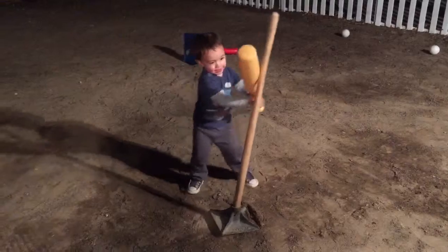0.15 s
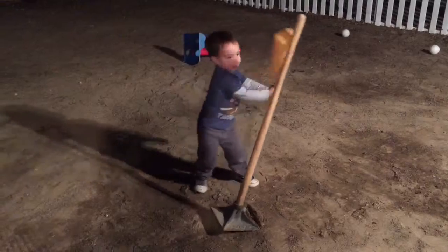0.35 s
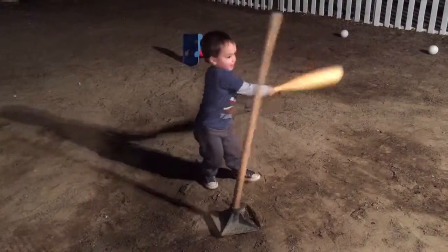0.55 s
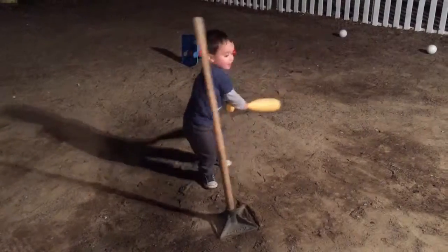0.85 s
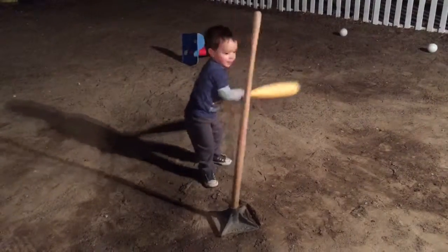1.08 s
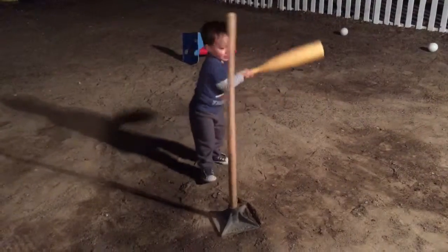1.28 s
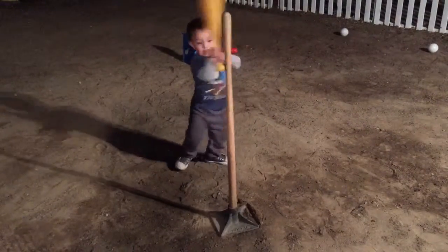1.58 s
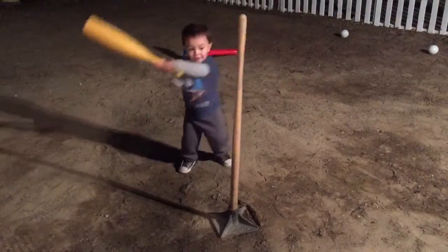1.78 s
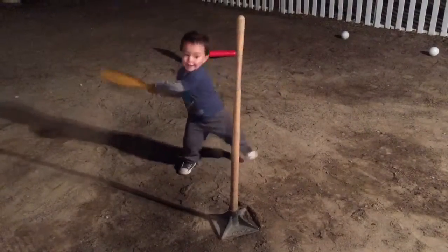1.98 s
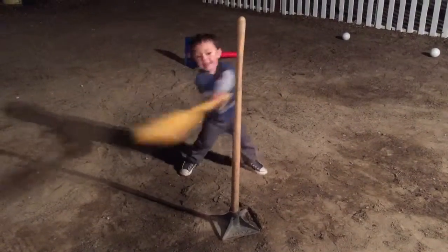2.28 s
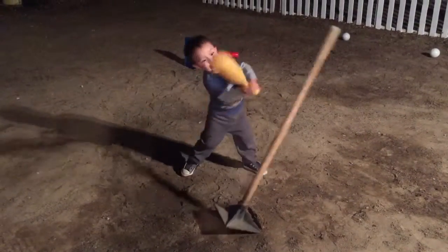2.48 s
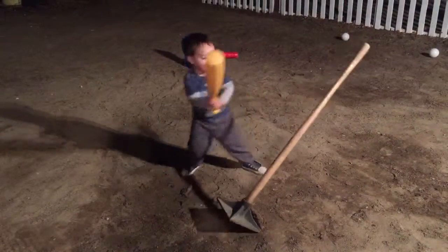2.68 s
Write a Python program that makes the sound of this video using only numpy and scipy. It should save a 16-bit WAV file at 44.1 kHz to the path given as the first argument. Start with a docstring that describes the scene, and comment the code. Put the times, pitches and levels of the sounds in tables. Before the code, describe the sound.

A hollow plastic bat lightly bumps a wooden pole, then gives it one loud whack.

```python
"""Plastic bat on a wooden pole

A quiet yard at night, one microphone close to an upright pole on a loose base. A hollow plastic bat
scrapes along the wood in thousands of tiny slips and slides off, then bumps it lightly while the
base clinks. A hard whack rings the bat's shell and the air inside it; nearby walls throw the sound
back to the microphone and the yard rings briefly."""
import sys
import numpy as np
from scipy import signal
from scipy.fft import rfft, irfft, next_fast_len
from scipy.io import wavfile

SR = 44100
rng = np.random.default_rng(int(sys.argv[2]) if len(sys.argv) > 2 else 0)


def to_wav(sig):
    """Store sig (one row per channel, or 1-D mono) as 16-bit WAV at the path in sys.argv[1].

    Samples outside -1..1 are clipped; the rate is SR.
    """
    pcm = np.clip(np.atleast_2d(sig), -1, 1) * 32767
    pcm = np.round(pcm).astype(np.int16)
    wavfile.write(sys.argv[1], SR, pcm.T)  # frames by channels


N = 125685
RING_SIZE = 8192  # samples


# the hard swing, close to the microphone: t/s, level/dB
WHACKS = [(2.475, -2.5)]
def whacks(mix):
    """A hard blow rings the bat and sets the yard sounding."""
    for start, db in WHACKS:
        add(mix, start, amp(db) * (blow_with_echoes() + yard_wash()))


# modes of the air inside the bat: f/Hz, level in a whack/dB, level in a bump/dB, t60/s
BAT_AIR_MODES = [(311.7, -30.5, -6, 0.26), (596, -34, 4.5, 0.033), (1140, -13, 4.5, 0.055),
                 (1664, -17, -1, .11), (2196, -16.5, 5.5, 0.074), (2937, -23.5, -11, 0.15),
                 (3590, -19.5, -11, 0.076), (6480, -33, -8.5, 0.055)]
# modes of its plastic wall, stirred only by a hard blow: f/Hz, level/dB, t60/s
BAT_WALL_MODES = [(141, -30, 0.066), (396.3, -15, 0.042), (630.3, -29, .15), (783, -23, 0.085),
                  (879, -21.5, .075), (1063, -34.5, 0.22), (1169, -23, 0.077), (1282, -22.5, 0.09),
                  (1589, -14.5, 0.15), (1617, -23.5, .15), (1787, -23, 0.078), (2005, -19.5, 0.21),
                  (2100, -11, 0.054), (2397, -14, 0.085), (2423, -25, .08), (2740, -28, 0.14),
                  (2812, -18, .04), (2976, -28.5, .09), (3270, -20, 0.046), (3450, -27.5, .12),
                  (3640, -18, 0.056), (4110, -36, 0.11), (4170, -27.5, 0.074)]
SHELL_RISE_S = 0.0011
def bat_ring():
    """The hollow note: air column and plastic wall ring together."""
    onset = 1 - np.exp(-times(RING_SIZE) / SHELL_RISE_S)
    return partials(BAT_AIR_MODES + BAT_WALL_MODES) * onset


# dense, short-lived ringing of the shell: f/Hz, spectral level/dB, t60/s
SHELL_BANDS = [(30, -44.5, .1), (150, -2.5, 0.076), (413, -1.5, 0.055), (830, 1, .054), (2260, 5.5, 0.077),
               (4450, -6, .07), (6320, -12, 0.035), (7500, -19.5, 0.017), (15880, -27.5, .025)]
# the crack of contact: f/Hz, spectral level/dB
CRACK_SPECTRUM = [(300, -22), (3000, -23.5), (4500, -2), (5700, 0.5), (6600, -8), (8000, -5),
                  (11000, -15.5), (13700, -12.5), (16500, -19)]
# the bat's wall snapping at the point of contact: f/Hz, level/dB, t60/s
SNAP_MODES = [(5360, -7.5, 0.012), (5745, -2.5, 0.007), (6310, -9, 0.014), (13130, -8.5, .003)]
def strike(crack_decay_s=0.00084):
    """A snap and crack at contact, then the shell's buzz; the fine grain differs with direction."""
    t = times(RING_SIZE // 2)
    shell = amp(-11) * dense_ring(SHELL_BANDS, len(t)) * (1 - np.exp(-t / SHELL_RISE_S))
    crack = amp(-4.5) * noise(CRACK_SPECTRUM, len(t)) * np.exp(-t / crack_decay_s)
    return shell + crack + partials(SNAP_MODES)[:len(t)]


# walls and fence, 7 to 36 m of extra path: delay/s, ring level/dB, strike level/dB, treble limit/Hz
WALL_ECHOES = [(0.0199, -1, -3.5, 2700), (0.0217, -11, -10, 4800), (0.0389, -12.5, -15.5, 4000),
               (.04406, -11, -10.5, 4200), (.04762, -10.5, -16, 2600), (.05425, -22.5, -24.5, 12000),
               (0.105, -32, -31.5, 9050)]
def blow_with_echoes(bass_limit_hz=114):
    """Ring and strike reach the microphone directly, then off the walls with the strike dulled."""
    sound = np.zeros(SR // 2)
    ring = bat_ring()
    add(sound, 0, ring)
    add(sound, 0, strike())
    for delay, ring_db, strike_db, limit_hz in WALL_ECHOES:
        add(sound, delay, amp(ring_db) * ring)
        add(sound, delay, amp(strike_db) * lowpass(strike(), limit_hz))
    # the blow carries little deep bass
    return signal.lfilter(*signal.butter(2, bass_limit_hz, "high", fs=SR), sound)


# the bat rubbing along the pole, close by: t/s, body level/dB, hiss level/dB
RUB_LEVELS = [(0, -64.5, -69.5), (.065, -74, -62.5), (.118, -60, -66.5), (.15, -55, -63),
              (.205, -64.5, -67.5), (.24, -72, -77), (.285, -64, -79), (.32, -63.5, -72.5),
              (0.401, -59.5, -53.5), (0.418, -51.5, -55.5), (.448, -56, -54), (0.472, -53, -57),
              (0.49, -47.5, -53.5), (0.501, -80, -72), (.56, -91, -86)]
# the rub's body and its hiss: f/Hz, spectral level/dB
RUB_BODY_SPECTRUM = [(80, -21), (170, 3), (540, -12.5), (2300, 0.5), (4600, -18)]
RUB_HISS_SPECTRUM = [(1500, -17), (4000, -3), (5000, -3), (5700, 1), (6400, 3), (7100, -9.5), (9500, -11),
                     (11000, -25), (14000, -20), (16000, -33)]
def scrape(slips_per_s=3000, spread_db=2, pole_db=2.5, yard_db=-16):
    """Tiny slips hiss at the contact and stir bat and pole; the yard adds a short tail."""
    t = times(4 * RING_SIZE)
    sizes = amp(spread_db * np.minimum(rng.exponential(1, len(t)), 4))
    pressure = waver(len(t), depth_db=0.6, rate_hz=117)
    slips = rng.standard_normal(len(t)) * sizes * pressure
    slips *= rng.random(len(t)) < slips_per_s / SR
    wood = unit_rms(signal.fftconvolve(slips, pole_ring())[:len(t)])
    knots, body_db, hiss_db = np.transpose(RUB_LEVELS)
    body = unit_rms(colour(slips, RUB_BODY_SPECTRUM) + amp(pole_db) * wood)
    body *= amp(np.interp(t, knots, body_db))
    hiss = colour(slips, RUB_HISS_SPECTRUM) * amp(np.interp(t, knots, hiss_db))
    direct = (body + hiss) * (t < knots[-1])
    tail = unit_rms(dense_ring(NEAR_SCATTER, RING_SIZE)) / np.sqrt(RING_SIZE)
    return direct + amp(yard_db) * signal.fftconvolve(direct, tail)[:len(t)]


# the sliding bat catches on the wood: t/s, level/dB
BAT_CATCHES = [(.411, -50), (.4665, -50.5), (.488, -53.5)]
def catches(mix, decay_s=0.0018):
    """Each catch is a quick cluster of slips that rings the pole."""
    t = times(SR // 50)
    for start, db in BAT_CATCHES:
        slips = rng.standard_normal(len(t)) * np.exp(-t / decay_s)
        ring = signal.fftconvolve(slips, pole_ring())
        add(mix, start, amp(db) * ring / np.std(ring[:len(t) // 2]))


# modes of the wooden pole: f/Hz, level/dB
POLE_MODES = [(420, -5.5), (715, -11), (795, -4.5), (1060, -1.5), (1770, 1.5), (2290, 1.5), (2760, -0.5),
              (3660, -0.5), (4400, -5), (5880, -0.5), (6300, -5)]
def pole_ring(t60_cycles=76):
    """The wood's ring; higher modes die sooner."""
    return partials([(hz, db, t60_cycles / hz) for hz, db in POLE_MODES])


# light contacts of bat and pole: t/s, level/dB, treble limit/Hz, rise/s, factor on the free ring time
LIGHT_BUMPS = [(.7715, -49, 4500, 0.0085, 0.63), (.7848, -45, 3120, 0.00092, 1.09),
               (.7955, -40, 6100, 0.0066, 0.24), (1.388, -56.5, 1870, 0.018, 1.28)]
def bumps(mix, buzz_db=-7.5):
    """Soft contacts sound the air in the bat and its shell; the pole's damping varies with each."""
    for start, db, limit_hz, rise_s, ring_factor in LIGHT_BUMPS:
        ring = partials([(hz, level, t60 * ring_factor) for hz, _, level, t60 in BAT_AIR_MODES])
        add(ring, 0, amp(buzz_db) * dense_ring(SHELL_BANDS, RING_SIZE // 2))
        onset = np.minimum(times(RING_SIZE) / rise_s, 1)
        add(mix, start, amp(db) * lowpass(ring, limit_hz) * onset)


# at the foot of the pole: t/s, level/dB, upper ring's relative level/dB, its rise/s
BASE_CLINKS = [(.7328, -52.5, -2.5, 0.00031), (.8215, -51, 20, 0.0082), (.847, -54.5, 15, 0.0028)]
def clinks(mix):
    """The loose base gives two short rings each time the pole rocks."""
    for start, db, upper_db, rise_s in BASE_CLINKS:
        lower = mode(hz=2270, t60=0.038)
        upper = amp(upper_db) * mode(hz=2904, t60=0.028, rise_s=rise_s)
        add(mix, start, amp(db) * (lower + upper))


# base and feet, at ground level: t/s, level/dB, f/Hz, t60/s
GROUND_THUDS = [(.758, -38.5, 199, 0.047), (.793, -43, 338, 0.097), (2.503, -38, 81.1, 0.076),
                (2.553, -38.5, 144, 0.14)]
def thuds(mix):
    """Soft, low pushes against the ground."""
    for start, db, hz, t60 in GROUND_THUDS:
        add(mix, start, amp(db) * mode(hz, t60, rise_s=0.015))


# bat, hands and shoes around the pole: middle t/s, level/dB, half length/s, centre f/Hz
BRIEF_SCUFFS = [(0.47, -43, 0.013, 2500), (0.598, -65, 0.0077, 1420), (1.073, -72.5, 0.031, 2010),
                (1.546, -76.5, 0.015, 1900), (1.979, -77, 0.047, 1930), (2.275, -66, 0.019, 1270)]
# their colour: f/centre f, spectral level/dB
SCUFF_SHAPE = [(.2, -6), (.6, 1), (1, 5), (1.35, 2.5), (2.2, -7), (5, -20)]
def scuffs(mix):
    """Short swells of friction noise."""
    t = times(RING_SIZE) - RING_SIZE / SR / 2
    for middle, db, half_s, hz in BRIEF_SCUFFS:
        friction = noise([(hz * ratio, level) for ratio, level in SCUFF_SHAPE], len(t))
        swell = np.exp(-.5 * (t / half_s) ** 2)
        add(mix, middle + t[0], amp(db) * friction * swell)


# grit under the bat and base: t/s, level/dB
GRIT_TICKS = [(.017, -55.5), (.026, -54), (.042, -57), (.092, -56), (.173, -52), (.183, -54), (.85, -61.5)]
# one speck: f/Hz, spectral level/dB
GRIT_SPECTRUM = [(1000, -33), (6000, 19.5), (7500, -9), (11000, 7), (13500, 12), (16000, 10)]
def grit(mix, decay_s=0.0042):
    """Specks of grit catch with a bright tick."""
    t = times(SR // 10)
    for start, db in GRIT_TICKS:
        add(mix, start, amp(db) * noise(GRIT_SPECTRUM, len(t)) * np.exp(-t / decay_s))


# scatter from near the microphone and from the far yard: f/Hz, spectral level/dB, t60/s
NEAR_SCATTER = [(30, -29.5, .3), (160, -3, 0.35), (300, 2.5, .19), (650, -7, 0.24), (1890, 4, 0.24),
                (6200, -11, 0.27), (9400, -13, 0.14), (15000, -27, .17)]
FAR_SCATTER = [(29.8, -18, .52), (79, 5.5, .77), (304, 8, 0.56), (585, -17.5, .85), (1970, 1, 1),
               (3200, -11, 1), (6140, -9, 0.68), (15000, -28.5, 0.3)]
def yard_wash(rise_s=0.012, clump_s=0.0068):
    """Surfaces return the whack in clumps: a quick scatter close by and a faint, longer tail."""
    t = times(SR // 2)
    clumps = waver(len(t), depth_db=2, rate_hz=.5 / clump_s)
    near = amp(-19.5) * dense_ring(NEAR_SCATTER, len(t))
    far = amp(-35.5) * dense_ring(FAR_SCATTER, len(t))
    return np.minimum(t / rise_s, 1) * clumps * (near + far)


# the still yard all around the microphone: f/Hz, spectral level/dB
AIR_SPECTRUM = [(12, -40), (34, -22.5), (60, -1), (101, -7.5), (154, -4.5), (234, -15), (470, -22.5),
                (620, -18), (1330, -23.5), (16000, -40)]
def night_air():
    """A faint, steady hush, mostly bass."""
    return amp(-67) * noise(AIR_SPECTRUM, next_fast_len(N))[:N]


def amp(db):
    return 10 ** (np.asarray(db) / 20)


def times(size):
    return np.arange(size) / SR


def unit_rms(x):
    return x / np.sqrt(np.mean(x ** 2) + 1e-20)


def add(mix, start_s, sound):
    part = mix[round(start_s * SR):][:len(sound)]
    part += sound[:len(part)]


def lowpass(x, hz):
    return signal.lfilter(*signal.butter(2, hz, fs=SR), x)


def waver(size, depth_db, rate_hz):
    """A gain that wanders at random."""
    return amp(depth_db * unit_rms(lowpass(rng.standard_normal(size), rate_hz)))


def colour(x, spectrum):
    """Gives x a spectrum, at unit rms."""
    knots_hz, levels = np.transpose(spectrum)[:2]
    hz = np.fft.rfftfreq(len(x), 1 / SR)
    gain = amp(np.interp(np.log1p(hz), np.log1p(knots_hz), levels))
    return unit_rms(irfft(rfft(x) * gain, len(x)))


def noise(spectrum, size):
    return colour(rng.standard_normal(size), spectrum)


def dense_ring(bands, size):
    """Dense ringing that starts at unit rms, each band dying at its own speed."""
    hz = np.fft.rfftfreq(size, 1 / SR)
    flat = irfft(np.exp(2j * np.pi * rng.random(len(hz))), size)
    spectrum = rfft(colour(flat, bands))
    knots_hz, _, t60s = np.transpose(bands)
    ring = np.zeros(size)
    for band, t60 in zip(np.eye(len(bands)), t60s):
        weight = np.interp(np.log1p(hz), np.log1p(knots_hz), band)
        ring += irfft(spectrum * weight, size) * amp(-60 * times(size) / t60)
    return ring


def mode(hz, t60, rise_s=0):
    """One dying partial."""
    t = times(RING_SIZE)
    onset = np.minimum(t / (rise_s + 1 / SR), 1)
    return np.sin(2 * np.pi * hz * t) * amp(-60 * t / t60) * onset


def partials(modes):
    """Modes struck together."""
    return sum(amp(db) * mode(hz, t60) for hz, db, *_, t60 in modes)


def scene():
    """Scrape, small contacts and the whack over the night air, in mono."""
    mix = night_air()
    add(mix, 0, scrape())
    for source in (whacks, bumps, clinks, thuds, grit, catches, scuffs):
        source(mix)
    return mix[None]


def record(dry):
    """The microphone's chain: a ceiling on the peak of the crack, then a 16.3 kHz band limit."""
    clipped = np.clip(dry, -.85, .85)
    band_limit = signal.firwin(255, 16300, window=("kaiser", 9), fs=SR)
    return signal.oaconvolve(clipped, band_limit[None], "same")


dry = scene()
out = record(dry)
to_wav(out)
```